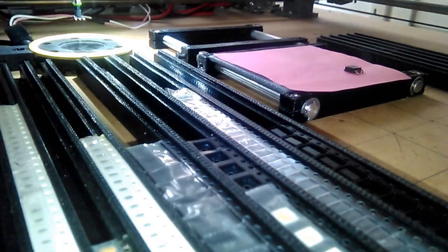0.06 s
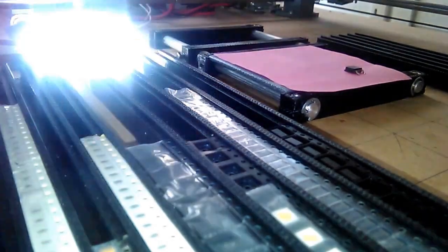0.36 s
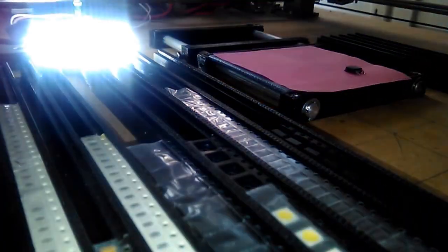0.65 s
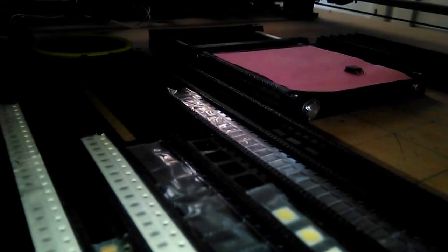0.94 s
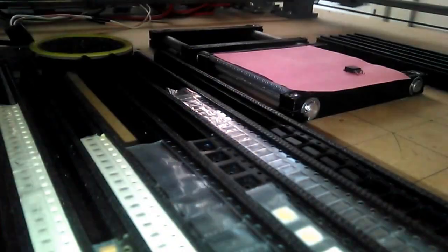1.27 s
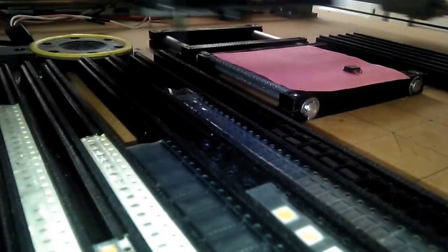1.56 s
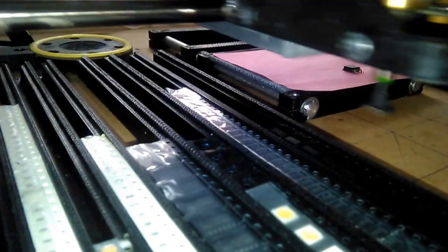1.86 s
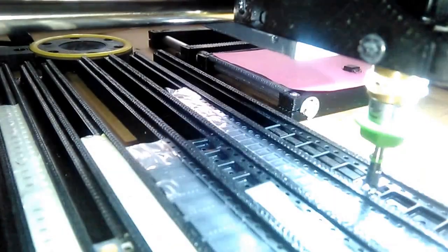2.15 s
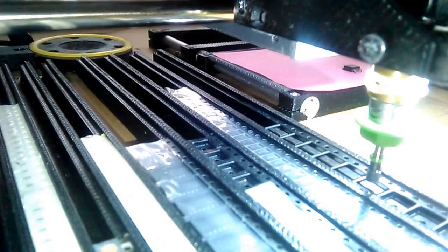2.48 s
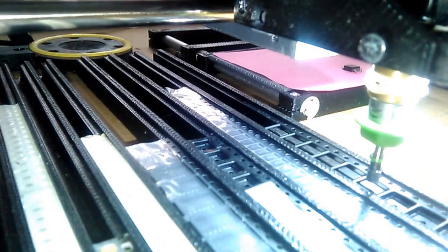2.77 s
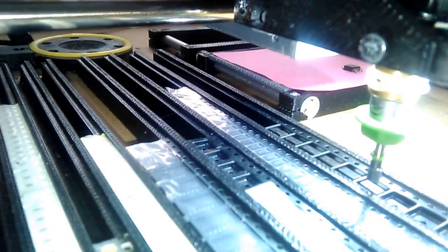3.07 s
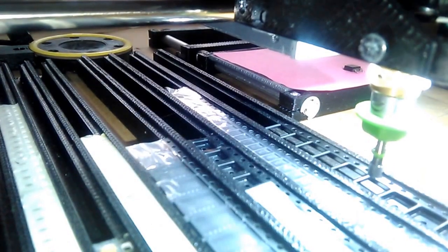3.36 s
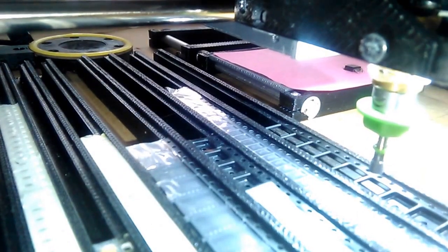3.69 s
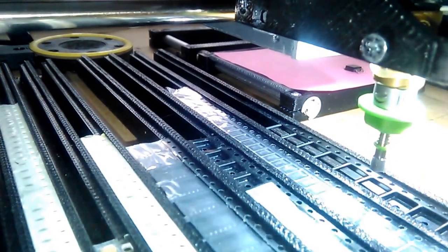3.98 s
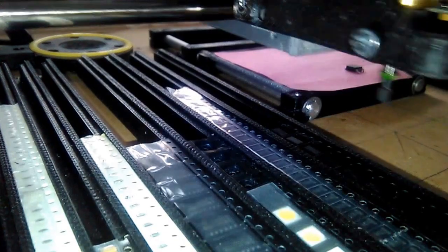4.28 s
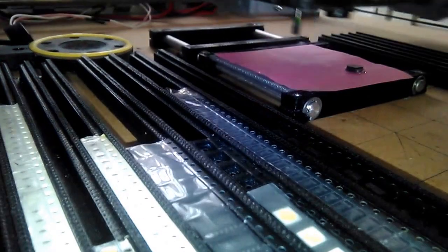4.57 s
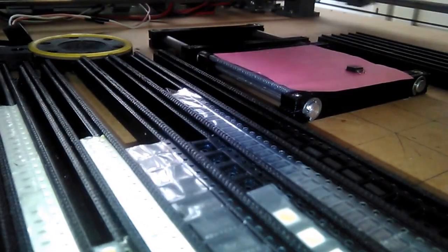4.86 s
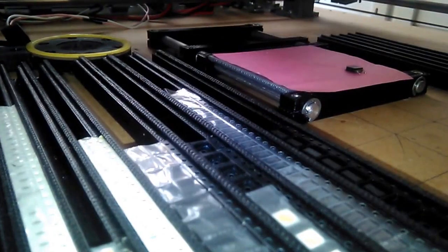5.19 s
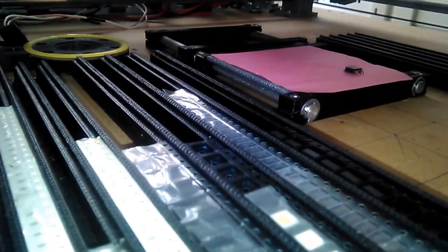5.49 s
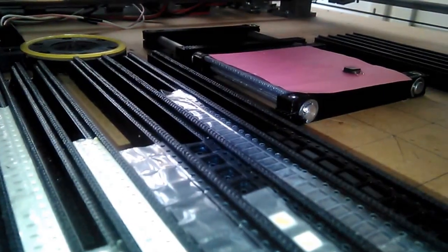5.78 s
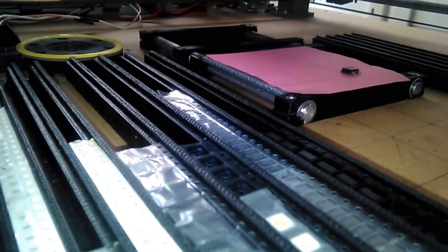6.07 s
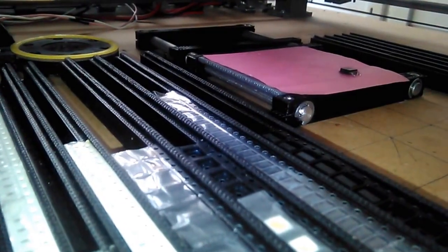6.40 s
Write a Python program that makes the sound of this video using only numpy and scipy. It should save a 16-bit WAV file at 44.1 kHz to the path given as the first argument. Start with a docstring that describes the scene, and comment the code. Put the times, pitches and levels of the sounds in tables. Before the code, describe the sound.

A pick-and-place machine whirs over a buzzing pump, stops with a sharp snap, knocks, whines faintly and whirs off again.

```python
"""A vacuum pump chugs on a workshop bench while the gantry of a small pick-and-place machine rolls up
to a parts tray, bearings rumbling, motor tones singing out in the frame, loose parts rattling.
A valve snaps, air escapes and the pump stops. The nozzle knocks down and rings the head, a stepper
whines, the nozzle lifts with a scrape and the gantry rolls away.
The electronics whistle faintly throughout, over a low room rumble."""
import sys
import numpy as np
from scipy import signal
from scipy.fft import rfft, irfft
from scipy.io import wavfile
from scipy.ndimage import uniform_filter1d

SR = 44100
rng = np.random.default_rng(int(sys.argv[2]) if len(sys.argv) > 2 else 0)


def store_wav(level_fs):
    """Save 16-bit WAV to argv[1]."""
    pcm = np.round(np.clip(np.atleast_2d(level_fs), -1, 1) * 32767)
    wavfile.write(sys.argv[1], SR, pcm.T.astype(np.int16))


N = 292824
TIME, FREQS = np.arange(N) / SR, np.arange(N // 2 + 1) * SR / N + 1e-3
PUMP_HZ, FIRST_STROKE_S, PUMP_OFF_S = 48.92, .0102, 2.125

# dull colour of rubbing: f/Hz, level/dB
RUB_COLOUR = [(40, -19), (110, 8), (300, 0.5), (750, -0.5), (1100, -5), (1600, -15), (5000, -37)]


def from_db(db):
    """Decibels to gain."""
    return np.exp(np.log(10) / 20 * np.asarray(db))


def rms_one(x):
    """Scale to unit rms."""
    return x / np.sqrt(np.mean(x ** 2) + 1e-20)


def evened(x):
    """Take out slow swings of level, keep the fast grain; rms 1."""
    return x / np.sqrt(uniform_filter1d(x ** 2, SR // 16) + 1e-20)


def curve(points, outside=None):
    """An automation curve through (time, value) points."""
    times, values = np.transpose(points)
    return np.interp(TIME, times, values, outside, outside)


def noise():
    """White noise."""
    return rng.standard_normal(N)


def band(x, low_hz, high_hz, order=2):
    """Butterworth band-pass."""
    return signal.sosfilt(signal.butter(order, [low_hz, high_hz], "band", fs=SR, output="sos"), x + 1e-18)


def drift(rate_hz):
    """A smooth random wander with spread 1."""
    size = N // 40 + 2
    hz = np.arange(size // 2 + 1) * SR / N
    slow = irfft(rfft(rng.standard_normal(size)) / (1 + (hz / rate_hz) ** 2), size)
    return np.interp(np.linspace(0, size - 1, N), np.arange(size), rms_one(slow))


def coloured(x, spectrum, resonances=()):
    """EQ a steady sound: a broad curve (f/Hz, level/dB) with resonances on top."""
    hz, db = np.transpose(spectrum)
    gain_db = np.interp(np.log(FREQS), np.log(hz), db)
    for centre, width, peak_db in resonances:
        gain_db += peak_db / (1 + ((FREQS - centre) / width) ** 2)
    return irfft(rfft(x) * from_db(gain_db), N)


def coloured_noise(spectrum):
    """Noise through an EQ curve; rms 1."""
    return rms_one(coloured(noise(), spectrum))


def clicks(times, heights):
    """Single-sample impulses."""
    out = np.zeros(N)
    out[np.clip(np.round(np.asarray(times) * SR).astype(int), 0, N - 1)] = heights
    return out


def ring(x, hz, t60):
    """A resonator: a unit click sets a sine of height 1 ringing."""
    radius, angle = np.exp(-np.log(1000) / (t60 * SR)), 2 * np.pi * hz / SR
    return signal.lfilter([0, np.sin(angle)], [1, -2 * radius * np.cos(angle), radius ** 2], x + 1e-18)


def rough_tone(hz, width_hz):
    """A tone on a pitch curve, with wandering phase and level; rms 1."""
    phase = 2 * np.pi * np.cumsum(hz) / SR
    return drift(width_hz) * np.sin(phase) + drift(width_hz) * np.cos(phase)


def swell(at_s, half_length_s):
    """A smooth bell of height 1 around a moment."""
    return np.exp(-((TIME - at_s) / half_length_s) ** 2)


def dying(at_s, t60):
    """Level 1 up to a moment, then an even decay."""
    return from_db(-60 * np.clip((TIME - at_s) / t60, 0, 2))


def burst(at_s, t60, attack_s=0.0013):
    """A quick attack and an even decay."""
    return np.clip((TIME - at_s) / attack_s, 0, 1) * dying(at_s, t60)


def ringing_on(level, t60):
    """An envelope follower with instant attack and a release set by t60."""
    fall = np.log(1000) * TIME / t60
    return np.exp(np.maximum.accumulate(np.log(level + 1e-9) + fall) - fall)


def room_tone(level_db=-60.9, side_db=-2, flutter_db=2, flutter_hz=23.44):
    """Lumpy room rumble and hum under a fluttering hiss; only the hiss has stereo width."""
    # colour of the workshop air: f/Hz, level/dB
    room_colour = [(18, -26), (30, -14), (62, -3), (123, -9), (143, -15), (180, -11.5), (238, -15),
                   (298, -15), (394, -19), (482, -17.5), (669, -22), (722, -19.5), (840, -23),
                   (1260, -25.5), (12500, -30.5), (16200, -34.5)]
    # fader on the treble hiss: t/s, gain/dB
    hiss_fader = [(0, -3), (1.2, -2.5), (1.9, 0), (2.4, -4), (6.64, -7.5)]
    # workshop hum: f/Hz, level/dB
    hum = [(118.4, -69)]
    mid, side = [from_db(level_db) * coloured_noise(room_colour) for _ in range(2)]
    hiss_gain = from_db(curve(hiss_fader) + flutter_db * np.sin(2 * np.pi * flutter_hz * TIME))
    bass = irfft(rfft(mid) / (1 + (FREQS / 200) ** 4), N)
    treble = irfft(rfft(mid) / (1 + (5000 / FREQS) ** 4), N)
    mid += bass * (from_db(drift(24)) - 1) + treble * (hiss_gain - 1)
    for hz, db in hum:
        mid += from_db(db + 2 * drift(0.67)) * np.sin(2 * np.pi * hz * TIME + drift(3.9))
    side = from_db(side_db) * hiss_gain * band(side, 5180, 13100, order=4)
    return np.array([mid + side, mid - side])


def workshop_reverb(x, t60=0.38, wet_db=-18):
    """A short, dull tail from the bench and walls."""
    tail = band(noise(), 220, 1530, order=1) * np.exp(-np.log(1000) * TIME / t60) * (TIME > .005)
    return from_db(wet_db) * signal.fftconvolve(x, tail / np.sqrt(np.sum(tail ** 2)))[:N]


def electronics_whistle(hz=13270.5, flutter_hz=32, fizz_width_hz=130):
    """A thin whistle in a band of fizz; part of the tone flutters as its polarity flips abruptly."""
    # states of the electronics, each held until the next: t/s, tone/dB, fluttering share, fizz/dB
    states = [(0, -69, 1, -78), (.56, -78, 0.8, -73), (.95, -95, 0.8, -84), (1.33, -79, .9, -77),
              (1.9, -75, 0.9, -75), (2.21, -67.5, 0.1, -90), (2.85, -68, .04, -88), (3.55, -68.5, 0.5, -87),
              (4.17, -78, 1.1, -74), (4.75, -73.5, 1, -76)]
    starts, *columns = np.transpose(states)
    state = np.searchsorted(starts[1:], TIME)
    tone_db, share, fizz_db = [uniform_filter1d(column[state], SR // 30) for column in columns]
    share = np.clip(share, 0, 1)
    flips = np.tanh(9 * np.sin(2 * np.pi * flutter_hz * TIME + .1 * drift(20)))
    phase = 2 * np.pi * hz * TIME
    tone = np.sqrt(2 * (1 - share)) * np.sin(phase) + np.sqrt(2 * share) * flips * np.cos(phase)
    fizz = rms_one(band(noise(), hz - fizz_width_hz, hz + fizz_width_hz))
    return from_db(tone_db) * tone + from_db(fizz_db) * fizz


def stepper_whine(waver=0.00072):
    """The nozzle stepper holds a steady rate; weaker tones beside the main one make it throb."""
    # fader on the nozzle motor: t/s, level/dB
    fader = [(2.885, -75), (2.92, -55), (3.4, -55.5), (3.8, -59), (4.03, -52.5), (4.06, -73)]
    # motor partials: f/Hz, relative level/dB
    partials = [(290.7, -16), (333.8, -5), (355.3, -20), (667.5, -22.5), (1001, -28)]
    phase_per_hz = 2 * np.pi * np.cumsum(1 + waver * drift(9)) / SR
    tone = sum(from_db(db + 1.2 * drift(4.5)) * np.sin(hz * phase_per_hz) for hz, db in partials)
    return from_db(curve(fader, outside=-120)) * np.sqrt(2) * tone


def head_slides():
    """The head shifts a little: a dull rub, and a scrape as the nozzle lifts."""
    # short slides: t/s, half length/s, rub/dB, scrape/dB
    slides = [(2.599, .022, -59.5, -80), (4.073, 0.023, -56, -74), (4.136, 0.02, -50.5, -63.5),
              (4.215, 0.1, -56.5, -91)]
    # bright colour of scraping: f/Hz, level/dB
    scrape_colour = [(900, -35), (1500, 7), (1850, 10), (2400, -6), (3400, -6), (4200, 9), (4900, -27),
                     (9000, -32), (15000, -50)]
    rub, scrape = coloured_noise(RUB_COLOUR), coloured_noise(scrape_colour)
    return sum(swell(at_s, half_s) * (from_db(rub_db) * rub + from_db(scrape_db) * scrape)
               for at_s, half_s, rub_db, scrape_db in slides)


def valve_gasps():
    """The vacuum collapses as the valve lets air into the nozzle in two gasps."""
    # rushes of air: t/s, sharp hiss/dB, soft puff/dB, t60/s
    gasps = [(2.135, -60.5, -59, 0.29), (2.18, -85, -63, 0.12)]
    hiss = rms_one(band(noise(), 9300, 10800))
    puff = rms_one(band(noise(), 900, 5400, order=1))
    return sum(burst(at_s, t60) * (from_db(hiss_db) * hiss + from_db(puff_db) * puff)
               for at_s, hiss_db, puff_db, t60 in gasps)


def bench_shake(shake_db=-52.5, swell_db=9, settle_db=-45, linger_db=-62):
    """The bench shakes at the stroke rate, hardest as the gantry rolls in; it settles after the pump."""
    shake = from_db(shake_db + swell_db * swell(1.73, 0.47)) * dying(PUMP_OFF_S, t60=0.99)
    settle = from_db(settle_db) * burst(PUMP_OFF_S, t60=0.47)
    linger = from_db(linger_db) * burst(PUMP_OFF_S, t60=3.5)
    phase = 2 * np.pi * PUMP_HZ * (TIME - FIRST_STROKE_S - .002)
    return shake * np.sqrt(2) * np.cos(phase) + (settle + linger) * coloured_noise(RUB_COLOUR)


def rattles(t60=0.074, trim_db=-2):
    """Loose parts chatter brightly while the gantry runs fast."""
    # chatters: t/s, level before trim/dB
    cues = [(1.385, -45), (1.471, -55), (1.560, -50), (1.819, -55), (4.354, -49.5), (4.385, -45.5),
            (4.599, -45), (4.63, -48), (4.758, -49.5), (4.811, -50), (4.915, -58)]
    chatter = coloured_noise([(900, -22), (1400, 9.5), (2300, 1.5), (2900, 0), (3500, -0.5),
                              (4300, -11), (5000, -24), (7000, -15), (14000, -46)])
    return chatter * sum(from_db(db + trim_db) * burst(at_s, t60, attack_s=0.0037) for at_s, db in cues)


def knocks(crack_s=0.0017, bass_lag_s=0.00244):
    """Each knock cracks and rings the head; the heavy low modes answer a little after the bright ones."""
    # belt take-up, valve snap, nozzle landing, carriage start: t/s, level/dB, brightness/Hz, crack/dB
    cues = [(1.254, -31.5, 900, -79), (2.134, -29.5, 6000, -40), (2.8805, -35.5, 1590, -66),
            (4.222, -46, 1200, -85)]
    # modes of the head: f/Hz, relative level/dB, t60/s
    head_modes = [(171, -11, 0.17), (210, -1.5, 0.051), (265, -4.5, 0.08), (298, -6.5, 0.12),
                  (330, -15, 0.037), (433, -7.5, 0.14), (476, -11, .14), (594, -10, .09),
                  (622, -3.5, 0.045), (880, -4, 0.01), (1280, -2.5, 0.021), (1860, -4.5, 0.028),
                  (2080, 4.5, 0.0045), (2390, -0.5, 0.014), (2880, -11, 0.011), (3950, -20, 0.01)]
    out = np.zeros(N)
    for at_s, db, bright_hz, crack_db in cues:
        for k, (hz, mode_db, t60) in enumerate(head_modes):
            height = from_db(db + mode_db) / np.sqrt(1 + (hz / bright_hz) ** 4) * (-1) ** k
            lag_s = bass_lag_s * (hz < 700) * rng.uniform(1, 1.59)
            out += ring(clicks([at_s + lag_s], height), hz, t60)
        crack = noise() * (TIME > at_s) * np.exp(-np.abs(TIME - at_s) / crack_s)
        out += from_db(crack_db) * band(crack, 1500, 13000)
    return out


def pump_stroke(thud_lag_s=0.0058, thud_below_hz=480, thud_gain=1.18, scatter=0.496, honk_phase=1.56):
    """One stroke: a short honk of the air valve, then the thud of the diaphragm."""
    # harmonics of the stroke: multiple of the stroke rate, relative level/dB
    harmonics = [(2, -4.5), (3, -13.5), (4, -5.5), (5, -5.5), (6, -2), (7, -7), (8, -8.5), (9, -14.5),
                 (10, -31.5), (11, -3), (12, -1), (13, -4), (14, -1.5), (15, 3), (16, 2.5), (17, 5),
                 (18, 1), (19, 4), (20, 2), (21, -2.5), (22, 2), (23, -12), (24, -13), (25, -28),
                 (26, -12.5), (27, -20.5), (28, -38), (29, -12.5), (30, -19.5)]
    orders, db = np.transpose(harmonics)
    hz, gains = orders * PUMP_HZ, from_db(db)
    t = np.arange(-int(SR / PUMP_HZ), int(SR / PUMP_HZ) + 1)[:, None] / SR
    # the lows come with the honk and again with the thud, smeared by the housing
    lows = 1 / (1 + (hz / thud_below_hz) ** 10)
    thud = thud_gain * np.exp(-2j * np.pi * hz * thud_lag_s)
    smear = scatter * np.exp(2j * np.pi * rng.random(len(hz)))
    phase = honk_phase + np.angle(1 + lows * (thud + smear))
    # the highest orders rattle out of step
    phase += rng.standard_normal(len(hz)) * (.15 + np.pi * (hz > 1100))
    waves = gains * np.cos(2 * np.pi * hz * t + phase)
    return waves.sum(1) * np.hanning(len(t)) / np.sqrt(np.sum(gains ** 2) / 2)


def pump(level_db=-40.5, swell_db=3, puff_db=-65, puff_lag_s=0.0072, puff_s=0.0029, flow_db=-55.5):
    """Diaphragm pump: strokes that swell as the gantry nears, ticking flaps, exhaust puffs, airflow."""
    # last strokes as the pump runs down: t/s, relative level/dB
    run_down = [(2.1362, -2.5), (2.1743, -0.5), (2.1817, -5)]
    # ticks of valve flaps and linkage: offset from the stroke/s, f/Hz, width/Hz, level/dB
    contacts = [(-.0022, 1760, 380, -53.5), (-.001, 2240, 318, -45.5), (.0047, 2040, 420, -51),
                (.0063, 2350, 380, -53.5), (.0082, 1690, 300, -51)]
    steady_s = np.arange(FIRST_STROKE_S, PUMP_OFF_S, 1 / PUMP_HZ)
    steady_db = swell_db * np.interp(steady_s, TIME, swell(1.75, 0.091))
    late_s, late_db = np.transpose(run_down)
    times = np.r_[steady_s, late_s]
    force = from_db(np.r_[steady_db, late_db] + .25 * rng.standard_normal(len(times)))
    out = from_db(level_db) * signal.fftconvolve(clicks(times, force), pump_stroke(), "same")
    for lag_s, hz, width_hz, db in contacts:
        ticks = clicks(times + lag_s, force * from_db(db + rng.standard_normal(len(times))))
        out += band(ring(ticks, hz, t60=np.log(1000) / (np.pi * width_hz)), 1570, 2440)
    puff_shape = np.exp(-(np.linspace(-.01, .01, SR // 50) / puff_s) ** 2)
    puffs = signal.fftconvolve(clicks(times + puff_lag_s, force), puff_shape, "same")
    exhaust_hz = 3150 + 330 * drift(396)
    out += from_db(puff_db) * puffs * rms_one(np.sin(2 * np.pi * np.cumsum(exhaust_hz) / SR))
    airflow = coloured_noise([(40, -13), (120, 7), (220, 0.5), (500, -2.5), (1000, -1), (1400, -10),
                              (2300, -12), (2700, -20), (4500, -22), (12000, -79)])
    return out + from_db(flow_db) * (TIME < late_s[-1]) * airflow


def motor_surges(width_hz=55, settle_s=.02, shudder_s=.35):
    """Motor tones sing out as they glide through frame modes; long, slow glides sound cleanest."""
    # sung tones: t/s, f/Hz, glide/(Hz per s), half length/s, level/dB
    surges = [(1.29, 172, 1398, 0.092, -39), (1.391, 2263, 900, 0.024, -55.5),
              (1.394, 297, 200, 0.075, -44.5), (1.429, 386.8, 492, 0.11, -39),
              (1.601, 686, -2000, 0.022, -34), (1.646, 2330, 2002, 0.078, -63),
              (1.671, 593, -100, 0.06, -39), (1.779, 748, 2000, 0.031, -40),
              (1.86, 117, -200, 0.055, -41.5), (1.92, 194, 900, 0.012, -41), (4.255, 135, -300, 0.024, -48),
              (4.396, 680, -600, 0.0099, -30), (4.48, 559, -100, 0.075, -39),
              (4.531, 400, -600, 0.016, -33.5), (4.605, 903, 300, 0.018, -34),
              (4.717, 364, -150, 0.044, -36.5), (4.79, 1163, 500, 0.042, -49),
              (4.825, 319, -500, 0.044, -37.5), (4.866, 506.7, -1200, 0.076, -38.5),
              (4.999, 234.4, -700, 0.077, -40.5), (5.211, 129, -50, 0.097, -61.5)]
    out = np.zeros(N)
    grit = evened(drift(width_hz)) + 1j * evened(drift(width_hz))
    for at_s, hz, glide, half_s, db in surges:
        t = TIME - at_s
        roughness = min(1, 1 / (1 + (half_s / settle_s) ** 2) + shudder_s * abs(glide) / hz)
        tone = np.exp(2j * np.pi * (hz * t + glide * t ** 2 / 2 + rng.random()))
        texture = np.sqrt(2 * (1 - roughness)) + np.sqrt(roughness) * grit
        out += from_db(db) * swell(at_s, half_s) * np.real(tone * texture)
    return out


def gantry(travel, rails, frame, *, grain_db, growl_db, boom_db, rumble_db, roll_db, rasp_db,
           rumble_power, roll_power, rasp_power, bumps_per_s=450, boom_width_hz=40, lurch_db=1.2):
    """Bearings and belt teeth bump along the rails: brighter when fast, more stepper growl when slow."""
    # narrow rail resonances that the motors excite: f/Hz, boost/dB
    rail_modes = [(368, 3.3), (560, 1.2), (680, 2), (925, 2.3), (1160, 4.6), (1510, 11)]
    step_hz = np.maximum(curve(travel, outside=0), 0)
    speed = step_hz / np.max(step_hz)
    # the frame booms when the step rate nears its lowest resonance
    frame_hz = frame[0][0]
    boom = from_db(boom_db / (1 + ((step_hz - frame_hz) / boom_width_hz) ** 2))
    # each layer grows as a power of the speed; frame and rails ring on
    rumble_gain = from_db(rumble_db) * ringing_on(speed ** rumble_power * boom, t60=0.6)
    roll_gain = from_db(roll_db) * ringing_on(speed ** roll_power, t60=0.18)
    roll_gain *= from_db(lurch_db * drift(16))   # the bearings catch
    rasp_gain = from_db(rasp_db) * speed ** rasp_power
    bumps = rms_one((rng.random(N) < bumps_per_s * np.sqrt(speed) / SR) * noise())
    modes = frame + [(hz, 8.8, db) for hz, db in rail_modes]   # width in Hz
    shaking = coloured(noise() + from_db(grain_db) * bumps, rails, modes)
    roll = evened(band(shaking, 198, 496, order=3) + speed ** .6 * band(shaking, 505, 1010, order=3))
    rasp = rms_one(band(shaking, 1280, 4900, order=4))
    # uneven stepping spreads the step tone into a rough band
    growl = rough_tone(np.maximum(step_hz, frame_hz), width_hz=75)
    # at speed the frame drones at its own pitch; on the ramps it partly follows the steps
    frame_noise = coloured(noise(), [(40, -3), (65, 2), (100, -3), (200, 1)], frame)
    drone = rms_one(band(frame_noise, 68, 186, order=4))
    growl_share = 0.21 * np.clip(2 - 4 * speed, 0, 1)
    rumble = evened(np.sqrt(growl_share) * growl + np.sqrt(1 - growl_share) * drone)
    return rumble_gain * rumble + roll_gain * (roll + from_db(growl_db) * growl) + rasp_gain * rasp


def gantry_arrives():
    """The gantry speeds up and brakes at the tray with a grainy growl."""
    # motor speed: t/s, full steps/(per s)
    travel = [(1.13, 7), (1.26, 126.5), (1.32, 280), (1.41, 484), (1.62, 647.5), (1.78, 400), (1.87, 123),
              (1.92, 4.9)]
    # colour of the rails: f/Hz, level/dB
    rails = [(88, -27), (150, 10.5), (259, -13), (295, 5), (400, 0), (448, -1), (579, 4), (852, -3),
             (1100, -11.5), (1620, -37.5), (2240, -40.5), (2620, -41.5), (7000, -62.5)]
    # frame resonances: f/Hz, width/Hz, boost/dB
    frame = [(119, 6.4, 22), (2230, 92, 11), (3530, 220, 4)]
    return gantry(travel, rails, frame, grain_db=-13, growl_db=-11.5, boom_db=2,
                  rumble_db=-42.5, roll_db=-35.5, rasp_db=-47.5,
                  rumble_power=0.39, roll_power=0.53, rasp_power=0.51)


def gantry_leaves():
    """The gantry rolls away, a little softer and smoother."""
    # motor speed: t/s, full steps/(per s)
    travel = [(4.22, -7), (4.25, 138), (4.32, 235.5), (4.39, 621), (4.62, 688), (4.87, 561.5), (5.0, 170),
              (5.06, 0)]
    # colour of the rails: f/Hz, level/dB
    rails = [(88, -24), (150, -1), (200, -18), (320, 2.5), (410, -1.5), (640, 3.5), (760, 1.5), (908, -6.5),
             (1000, -8), (1520, -32), (1720, -40.5), (2350, -39.5), (4390, -52), (5200, -68)]
    # frame resonances: f/Hz, width/Hz, boost/dB
    frame = [(149.7, 5.2, 18), (2300, 120, 5.6), (4400, 240, 4)]
    return gantry(travel, rails, frame, grain_db=-15, growl_db=-16.5, boom_db=4,
                  rumble_db=-43, roll_db=-37.5, rasp_db=-49.5,
                  rumble_power=0.43, roll_power=0.79, rasp_power=1.13)


def scene():
    """The machine sits close and centred; only the knocks feed the reverb."""
    moves = gantry_arrives() + gantry_leaves()
    hits = knocks()
    machine = moves + pump() + bench_shake() + motor_surges() + rattles() + head_slides()
    machine += hits + workshop_reverb(hits) + valve_gasps() + stepper_whine() + electronics_whistle()
    return machine + room_tone()


def record(dry, low_cut_hz=36, high_cut_hz=14330):
    """The microphone drops the deep bass; the top is cut steeply."""
    dry = signal.sosfilt(signal.butter(6, low_cut_hz, "high", fs=SR, output="sos"), dry)
    return signal.sosfilt(signal.ellip(12, .1, 70, high_cut_hz, fs=SR, output="sos"), dry)


dry = scene()
out = record(dry)
store_wav(out)
```